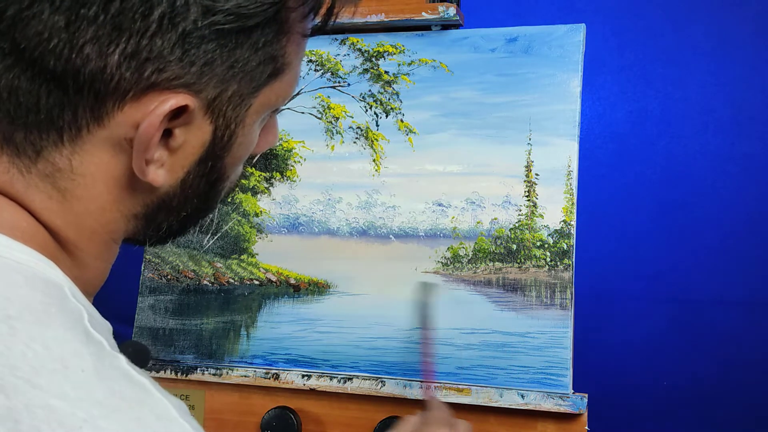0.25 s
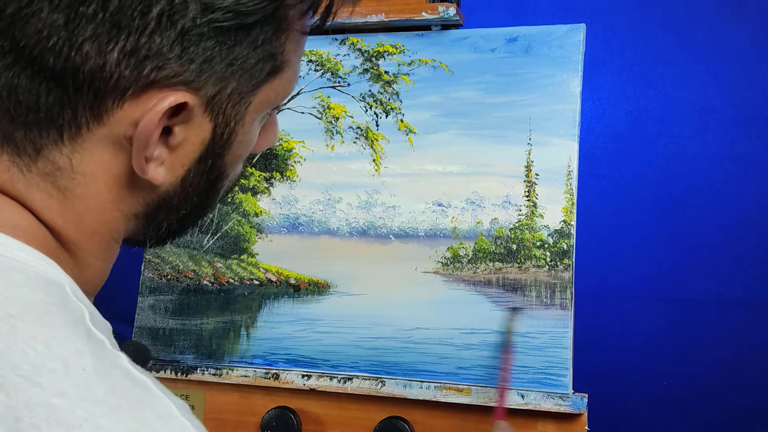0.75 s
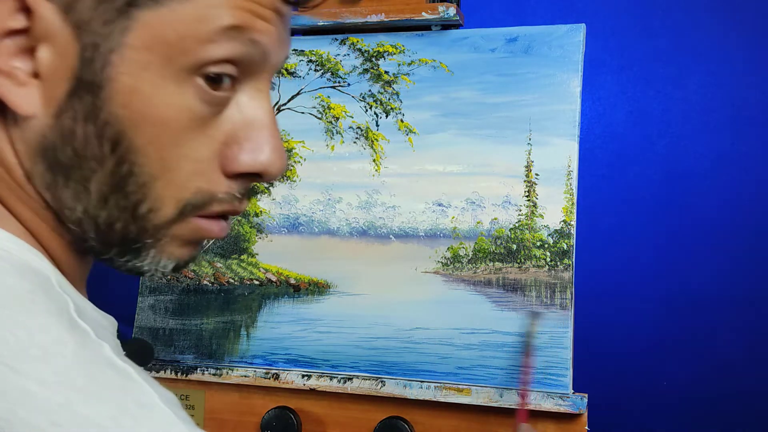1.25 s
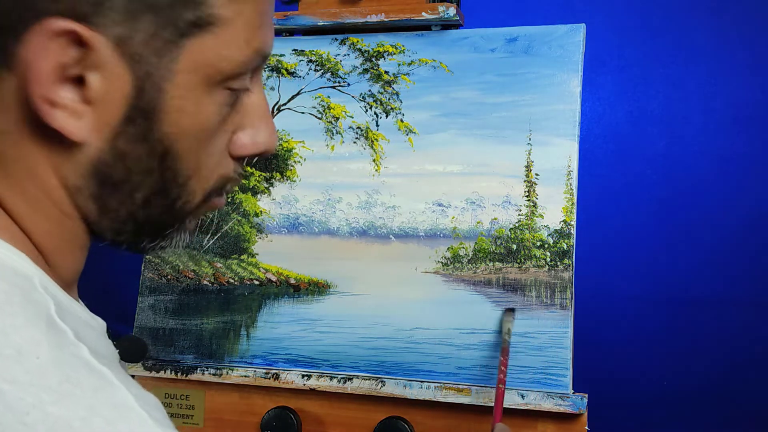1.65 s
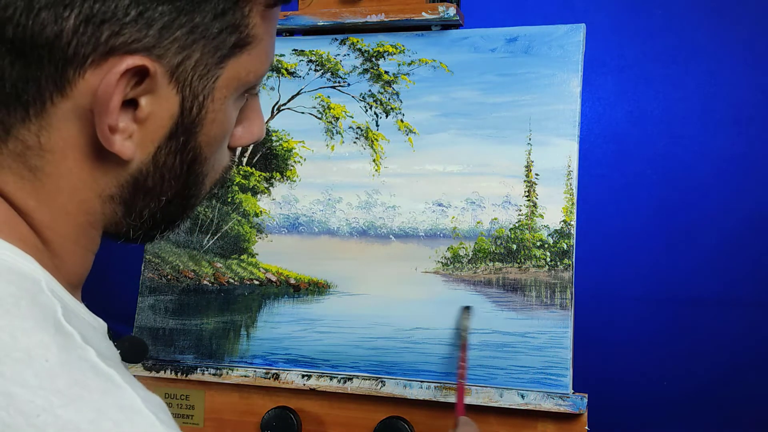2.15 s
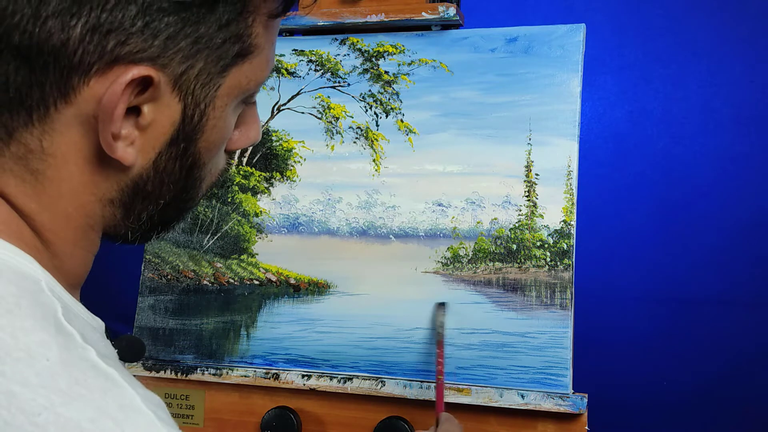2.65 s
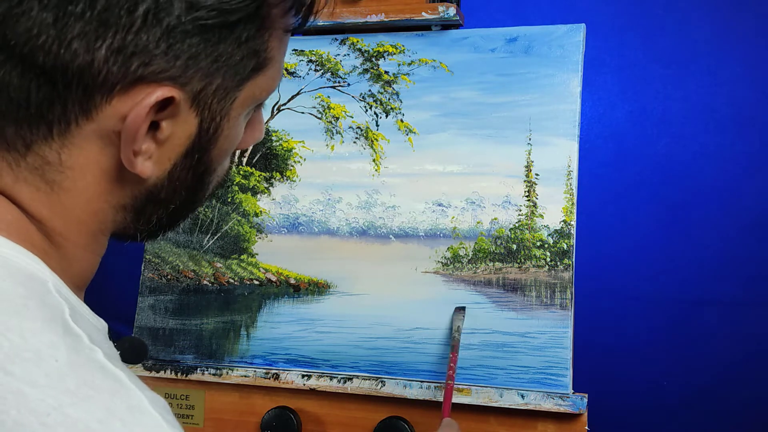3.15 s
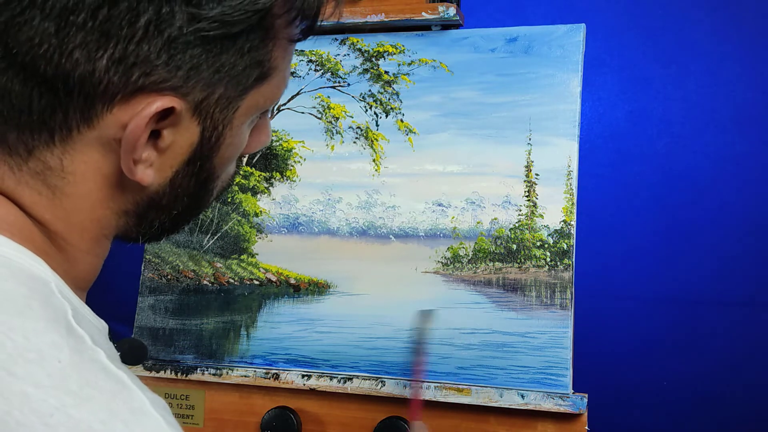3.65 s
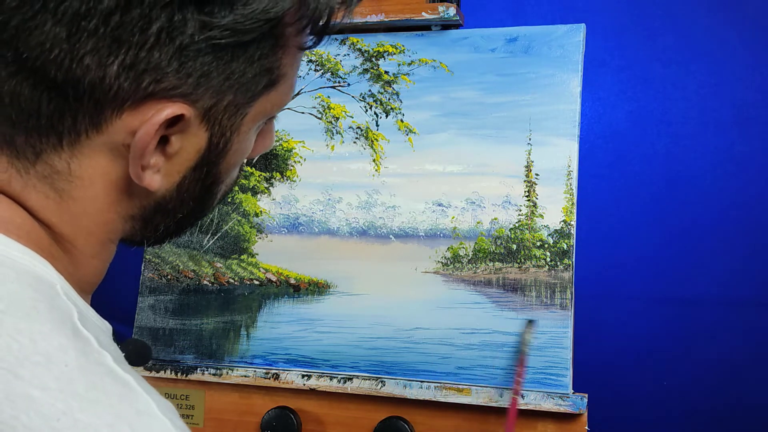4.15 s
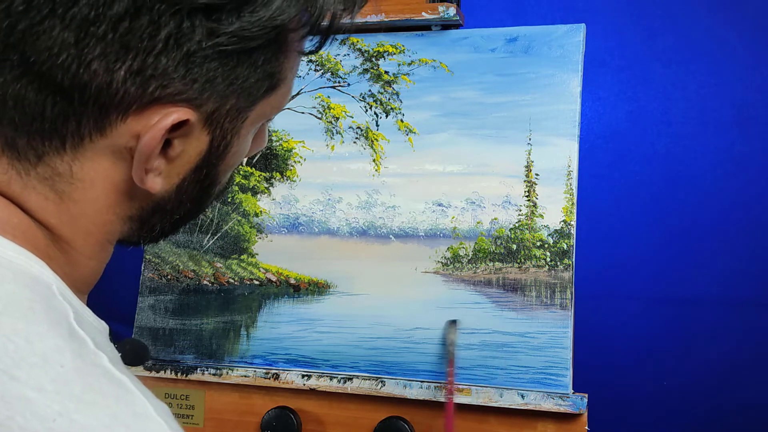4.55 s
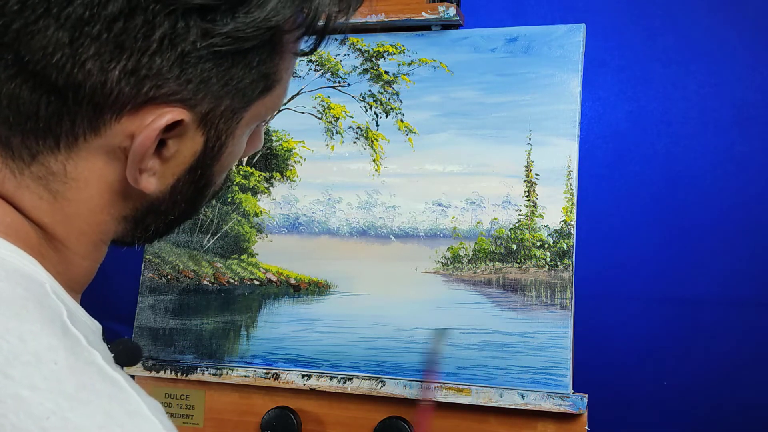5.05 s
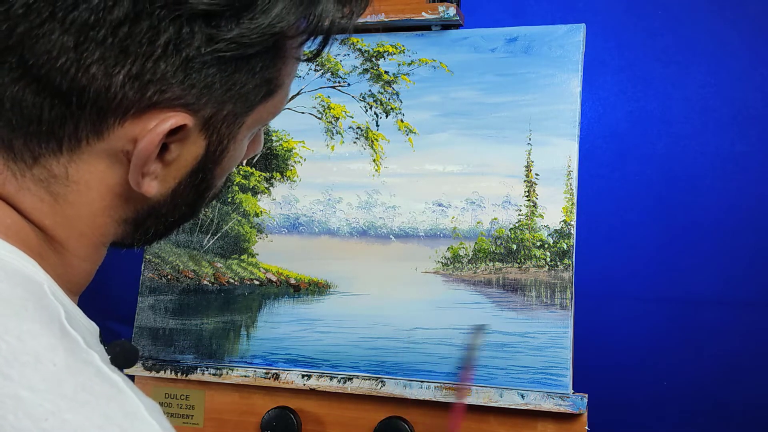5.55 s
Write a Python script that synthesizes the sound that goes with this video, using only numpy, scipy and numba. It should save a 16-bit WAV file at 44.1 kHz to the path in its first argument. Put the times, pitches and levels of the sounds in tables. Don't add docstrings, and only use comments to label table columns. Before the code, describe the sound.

In a quiet indoor room, bristles rasp over taut woven cloth: two quick strokes, a lull with weak dabs, then regular swishes that become longer and firmer, ending in a tight quick pair. Sharp little ticks mark some landings. The sound is near, crisp and treble-heavy, a touch left of centre, with short soft wall reflections, a faint wavering machine hum and slow deep rumble underneath.

```python
import sys
import numpy as np
from scipy import signal
from scipy.fft import rfft, irfft, next_fast_len
from scipy.io import wavfile
from scipy.ndimage import uniform_filter1d
from numba import njit

SR = 44100
rng = np.random.default_rng(int(sys.argv[2]) if len(sys.argv) > 2 else 0)


def voltage_ratio(decibels):
    exponent = np.asarray(decibels, float) / 20
    return 10 ** exponent


def wav_record(signal):
    frames = np.transpose(np.atleast_2d(signal))
    bounded = np.clip(frames, -1, 1)
    quanta = np.round(bounded * 32767).astype(np.int16)
    wavfile.write(sys.argv[1], SR, quanta)


N = 255339
PADDED = next_fast_len(N)

# landing t/s, time to firmest press t/s, hiss level/dB, weave tone over hiss level/dB,
# low cloth thrum over hiss level/dB
FIRM_STROKES = [(-0.01, 0.035, -48, -22, -9.5), (0.203, 0.03, -46, -14, -3.5), (0.933, .03, -53, -17, -16),
                (1.113, 0.02, -49.5, -11.5, -24), (1.32, 0.029, -44, -10, -22),
                (1.572, 0.012, -57.5, -5.5, -5), (1.765, 0.03, -47.5, -13, -12),
                (1.965, 0.02, -51.5, -10, -13), (2.194, 0.035, -46, -13.5, -17),
                (2.41, 0.054, -44.5, -14, -15), (2.623, .033, -47.5, -15.5, -11),
                (2.773, 0.033, -45.5, -10.5, -20.5), (2.938, 0.049, -47, -14, -18),
                (3.11, 0.063, -46, -16, -19), (3.49, 0.049, -46.5, -18, -13),
                (3.869, 0.073, -48, -8.5, -12), (4.228, 0.083, -41.5, -13, -20.5),
                (4.598, 0.073, -42.5, -6, -13), (4.888, 0.067, -42.5, -11.5, -17),
                (5.166, 0.027, -47, -23, -8), (5.379, 0.031, -43.5, -16, -12.5),
                (5.528, 0.044, -46, -0.5, -16.5), (5.584, 0.04, -41, -12, -17)]
# landing t/s, time to firmest press t/s, hiss level/dB,
# change of cloth ring level/dB
LIGHT_STROKES = [(0.31, 0.035, -53.5, 3.5), (0.532, 0.028, -58.5, 0.5), (0.6, 0.015, -56, 0),
                 (0.727, 0.038, -54, -4.5), (0.791, 0.022, -58, 7.5), (1.061, 0.0042, -60, 10),
                 (1.4, 0.032, -62, -1), (1.737, 0.006, -66, 19.5), (1.85, 0.026, -72, -3),
                 (2.28, 0.025, -60.5, -6), (2.52, 0.055, -64, 0), (2.69, 0.086, -63, 5),
                 (2.86, 0.089, -63, -3), (3.385, 0.022, -69, 3), (3.808, 0.033, -53.5, -0.5),
                 (4.02, 0.025, -56, 6), (4.09, 0.037, -55.5, -1), (4.35, 0.048, -58, 4),
                 (4.759, 0.063, -48, -3), (5.01, 0.05, -57.5, -4), (5.452, 0.074, -57.5, 6),
                 (5.774, 0.018, -50, -5)]
# t/s, threads crossed per second f/Hz
THREAD_RATE = [(0.0, 2240), (1.1, 2300), (1.36, 2500), (1.8, 2340), (2.25, 2250), (2.8, 2350), (3.2, 2280),
               (3.53, 1900), (3.94, 2360), (4.31, 2270), (4.67, 2280), (4.9, 2400), (4.99, 2800),
               (5.2, 2380), (5.42, 2340), (5.535, 2460), (5.59, 1980), (5.66, 2440)]
# f/Hz, width/Hz, level/dB
BRISTLE_MODES = [(5205, 650, -5), (6260, 1160, -0.5), (6345, 1530, 2.5), (8020, 1020, 0.5), (8644, 1130, 0),
                 (10230, 1500, 1), (11460, 2300, 1), (13430, 2740, -2.5)]
# f/Hz, width/Hz, level/dB
CLOTH_MODES = [(2850, 930, -3), (3490, 230, 1.5), (3830, 215, 2), (4280, 300, 3.5), (4724, 405, -1)]
# f/Hz, width/Hz, level/dB
THRUM_MODES = [(560, 140, -4), (760, 62, 4.5), (1020, 156, 1), (1259, 124, 0.5), (1657, 177, -0.5)]
# f/Hz, level per Hz/dB
AIR_SPECTRUM = [(15, 2), (40, -11), (81, -9.5), (133, -16.5), (346, -23), (766, -28), (1500, -36),
                (3370, -47), (6000, -61.5), (12000, -58)]
# f/Hz, likeness (1 = same, 0 or below = unrelated)
AIR_LIKENESS = [(60, 0.53), (180, 0.87), (540, 0.48), (1620, 0.0098), (4880, 0.13), (14600, -0.71)]
# f/Hz, width/Hz, rms level/dB
HUM_TONES = [(74.2, 3.7, -74), (121.17, 10.9, -63), (152.6, 16.8, -65.5), (214.7, 13.4, -70),
             (241.6, 24, -72), (305.3, 6.9, -79)]
# t/s, level/dB
RUMBLE_SWELLS = [(0.0, -45.5), (0.29, -42.5), (0.76, -49), (0.92, -38), (1.01, -48.5), (1.68, -43.5),
                 (1.76, -51.5), (2.03, -40), (2.42, -47.5), (2.56, -43.5), (3.89, -49.5), (4.27, -41.5),
                 (4.4, -49.5), (4.77, -39), (5.05, -47), (5.18, -35), (5.29, -39.5), (5.79, -48.5)]
# t/s, peak level/dB,
# cloth knock over the peak level/dB
SNAP_EVENTS = [(0.2324, -34, -2), (0.2434, -35, -11), (0.9426, -31, -8), (1.3329, -43, -6),
               (2.203, -28, -19), (2.6375, -23, -16), (3.1182, -21.5, -15), (4.6734, -35, 2),
               (4.8094, -44, -13), (4.9194, -24.5, -11), (5.223, -29, -4), (5.4143, -30, -1),
               (5.4204, -30, 3.5), (5.572, -33, -6), (5.6404, -26, -2)]
# f/Hz, left level/dB, right level/dB
PORT_COLOUR = [(3000, 0.5, 1), (5040, 3, 5.5), (6050, 10, 16.5), (7420, 6.5, 19.5), (8080, 21.5, 5),
               (8845, 20, 14), (8590, 19, 12), (9370, 11.5, -2.5), (12100, -8.5, -26), (11940, -2.5, -71),
               (15700, -15, -88)]

ATTACK_S, ATTACK_PER_PRESS, EARLY_TOUCH_S = 0.033, 0.26, 0.032
LANDING_SHARE, LIFT_S, LIFT_PER_PRESS = 0.8, 0.089, 1
PRESSURE_POWER = 4
LIGHT_WEAVE_DB, LIGHT_THRUM_DB = -15, -11.5
RING_DB, RING_PER_DB, LANDING_RING_DB, LIFTING_RING_DB = -11, 0.4, -5, 2.5
PAN_DB, LANDING_PAN_DB, ROOM_PAN_DB = 3.5, 1, -2
BRISTLE_SHIFT_DB, CLOTH_SHIFT_DB, THRUM_SHIFT_DB = 1.8, 2.5, 2.5
RIGHT_LAG_S = .00006
ROOM_T60_S, ROOM_DB = 0.31, -4
AIR_DB = -51.5
HUM_DB, HUM_WANDER_DB = 0.5, 2
SNAP_BARE_DB = -11


def rms_one(x):
    return x / np.sqrt(np.mean(x ** 2) + 1e-20)


def in_time(rows):
    s, *columns = np.transpose(rows)
    return [np.interp(np.arange(N) / SR, s, column) for column in columns]


def at_hz(hz, table_hz, values):
    return np.interp(np.log(np.maximum(hz, 1)), np.log(table_hz), values)


def drift(rate):
    r = np.exp(-80 * np.pi * rate / SR)
    noise = rng.standard_normal(N // 40 + 2002)
    slow = signal.lfilter([1], [1, -2 * r, r * r], noise)[2000:]
    return np.interp(np.arange(N) / 40, np.arange(len(slow)), rms_one(slow))


def resonate(x, hz, width_hz):
    r = np.exp(-np.pi * width_hz / SR)
    top = np.array([1, 0, -1]) * (1 - r * r) / 2
    return signal.lfilter(top, [1, -2 * r * np.cos(2 * np.pi * hz / SR), r * r], x)


def hand():
    firm = [(*row, 0) for row in FIRM_STROKES]
    light = [(s, swell, db, LIGHT_WEAVE_DB, LIGHT_THRUM_DB, ring) for s, swell, db, ring in LIGHT_STROKES]
    land_s, swell_s, db, weave_db, thrum_db, dab_db = np.array(firm + light).T[:, :, None]
    s = np.arange(0, N / SR + .002, .001)
    touch = np.clip((s - land_s + EARLY_TOUCH_S) / (ATTACK_S + ATTACK_PER_PRESS * swell_s), 0, 1)
    swell = np.clip((s - land_s) / swell_s, 0, 1)
    lift = np.clip(1 - (s - land_s - swell_s) / (LIFT_S + LIFT_PER_PRESS * swell_s), 0, 1)
    pressure = touch * (LANDING_SHARE + (1 - LANDING_SHARE) * swell) * lift
    power = (voltage_ratio(db) * pressure ** PRESSURE_POWER) ** 2 + 1e-14
    total = power.sum(axis=0)
    share = power / total
    lightness_db = LANDING_RING_DB * (1 - swell) + LIFTING_RING_DB * (1 - lift)
    ring_db = RING_DB + RING_PER_DB * (db + 47) + lightness_db + dab_db
    thrum_db = thrum_db + lightness_db
    weave_db = weave_db + 0.25 * lightness_db
    pan_db = PAN_DB + LANDING_PAN_DB * (1 - swell)
    colours = [(share * colour).sum(axis=0) for colour in (ring_db, thrum_db, weave_db, pan_db)]
    return in_time(np.transpose([s, np.sqrt(total), *colours]))


def slips(per_s, spread_db):
    size_db = spread_db * np.minimum(rng.exponential(1, N), 5)
    ticks = voltage_ratio(size_db) * rng.choice([-1, 1], N)
    return rms_one(ticks * (rng.random(N) < per_s / SR))


def body(force, modes, shift_db, shifts_per_s):
    total = 0
    for k, (hz, width_hz, db) in enumerate(modes):
        ring = voltage_ratio(db + shift_db * drift(shifts_per_s)) * resonate(force, hz, width_hz)
        total = total + ring * (-1) ** k
    return rms_one(total)


@njit
def glide(x, turn, r):
    out = np.zeros(len(x))
    for i in range(2, len(x)):
        out[i] = x[i] - x[i - 2] + 2 * r * np.cos(turn[i]) * out[i - 1] - r * r * out[i - 2]
    return out


def brush():
    level, ring_db, thrum_db, weave_db, pan_db = hand()
    weave_hz, = in_time(THREAD_RATE)
    shared, *own = [slips(per_s=9000, spread_db=2.0) for k in range(3)]
    late = np.interp(np.arange(N) - RIGHT_LAG_S * SR, np.arange(N), shared)
    force = 0.74 * np.array([shared, late]) + 0.69 * np.array(own)
    force = force * voltage_ratio(1.9 * drift(50))
    hiss = body(force, BRISTLE_MODES, BRISTLE_SHIFT_DB, shifts_per_s=13.3)
    ring = body(force, CLOTH_MODES, CLOTH_SHIFT_DB, shifts_per_s=6.2)
    thrum = body(force, THRUM_MODES, THRUM_SHIFT_DB, shifts_per_s=3.4)
    r = np.exp(-np.pi * 300 / SR)
    weave = rms_one(np.array([glide(f, 2 * np.pi * weave_hz / SR, r) for f in force]))
    sound = voltage_ratio(-7.5) * hiss + voltage_ratio(ring_db + 0.5) * ring
    sound = sound + voltage_ratio(thrum_db) * thrum + voltage_ratio(weave_db - 4.0) * weave
    return level * voltage_ratio(np.array([pan_db, -pan_db]) / 2) * sound


def room(x):
    t = np.arange(SR // 2) / SR
    tail = rng.standard_normal((2, len(t))) * voltage_ratio(-60 * t / ROOM_T60_S) * np.clip(t / 0.0025, 0, 1)
    tail = tail / np.sqrt(np.sum(tail ** 2, axis=1, keepdims=True))
    return signal.fftconvolve(x, tail, axes=1)[:, :N]


def pair(alike):
    mid, side = rfft(rng.standard_normal((2, PADDED)))
    return np.sqrt(1 + alike) * mid + np.sqrt(1 - alike) * side * [[1], [-1]]


def air():
    hz = np.fft.rfftfreq(PADDED, 1 / SR)
    alike = np.clip(at_hz(hz, *np.transpose(AIR_LIKENESS)), 0, .98)
    spectrum = pair(alike) * voltage_ratio(at_hz(hz, *np.transpose(AIR_SPECTRUM)))
    return voltage_ratio(AIR_DB) * rms_one(irfft(spectrum, PADDED)[:, :N])


def hum():
    noise = irfft(pair(0.84), PADDED)[:, :N]
    rumble_db, = in_time(RUMBLE_SWELLS)
    upper_db = HUM_DB + HUM_WANDER_DB * drift(0.79)
    lower_db = HUM_DB + HUM_WANDER_DB * drift(1.15)
    tones = 0
    for hz, width_hz, db in HUM_TONES:
        tone = rms_one(resonate(resonate(noise, hz, width_hz), hz, width_hz))
        tones = tones + voltage_ratio(db + (upper_db if hz > 140 else lower_db)) * tone
    rumble = rms_one(resonate(resonate(noise, 30.0, 7.9), 27.7, 13.4))
    rumble = rumble / np.sqrt(0.74 + uniform_filter1d(np.mean(rumble ** 2, axis=0), size=4000))
    return tones + voltage_ratio(rumble_db - 4.5) * rumble


def snaps():
    s, peak_db, knock_db = np.transpose(SNAP_EVENTS)
    at = (s * SR).astype(int)
    bare, knock = np.zeros(N), np.zeros(N)
    bare[at] = voltage_ratio(peak_db + SNAP_BARE_DB)
    knock[at] = voltage_ratio(peak_db + knock_db + 12)
    bright = signal.butter(2, [1800, 10500], "band", fs=SR, output="sos")
    click = signal.sosfilt(bright, bare + 1e-18)
    thuds = [voltage_ratio(db) * resonate(knock + 1e-18, hz, 0.7 * width) for hz, width, db in THRUM_MODES]
    return click + sum(thuds)


def scene():
    scrub = brush() + snaps()
    walls = voltage_ratio(ROOM_DB + np.array([[ROOM_PAN_DB], [-ROOM_PAN_DB]]) / 2) * room(scrub)
    return voltage_ratio(-3.5) * scrub + walls + air() + hum()


def roll_off(x):
    return signal.sosfilt(signal.butter(12, 15250, fs=SR, output="sos"), x)


def record(dry):
    port_hz, left_db, right_db = np.transpose(PORT_COLOUR)
    hz = np.fft.rfftfreq(PADDED, 1 / SR)
    colour = voltage_ratio(np.array([at_hz(hz, port_hz, left_db), at_hz(hz, port_hz, right_db)]))
    heard = irfft(rfft(dry, PADDED) * colour, PADDED)[:, :N]
    return roll_off(heard)


dry = scene()
out = record(dry)
wav_record(out)
```